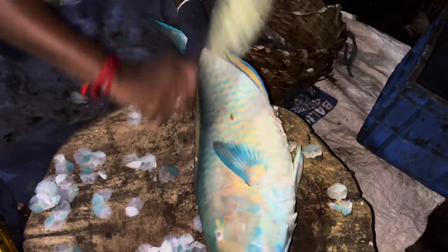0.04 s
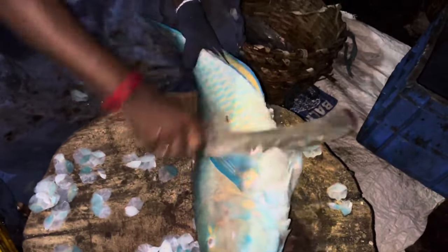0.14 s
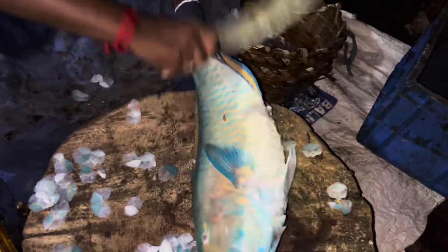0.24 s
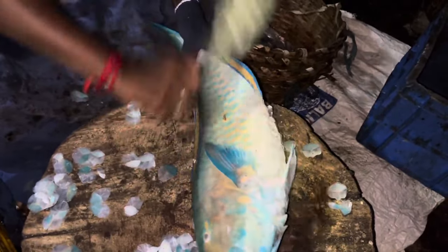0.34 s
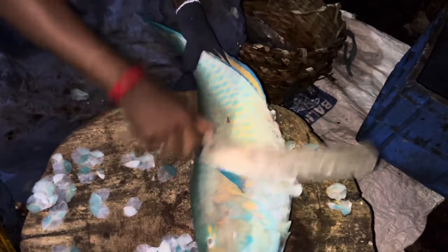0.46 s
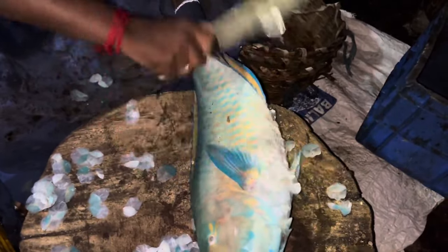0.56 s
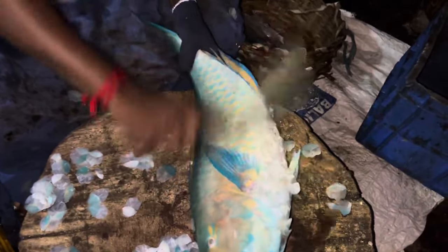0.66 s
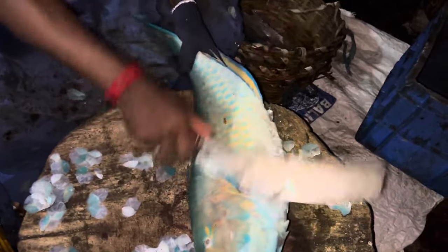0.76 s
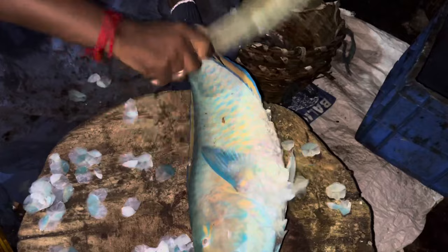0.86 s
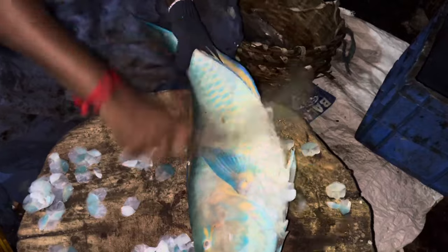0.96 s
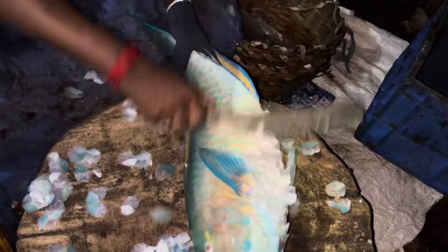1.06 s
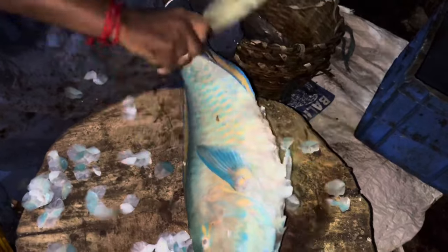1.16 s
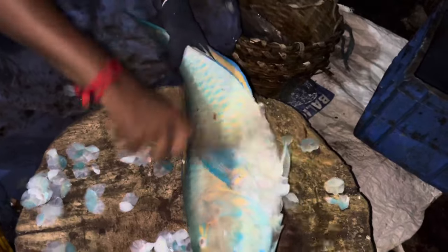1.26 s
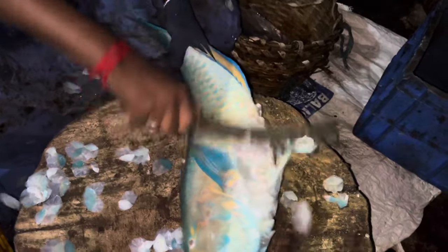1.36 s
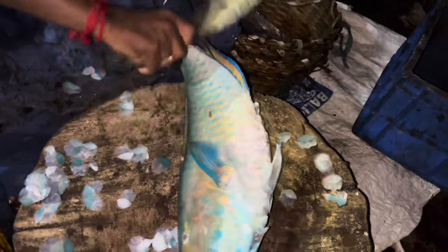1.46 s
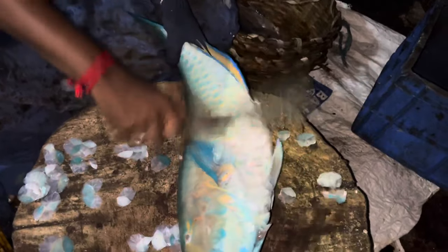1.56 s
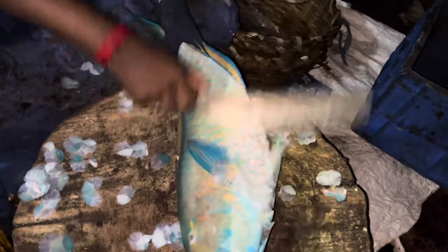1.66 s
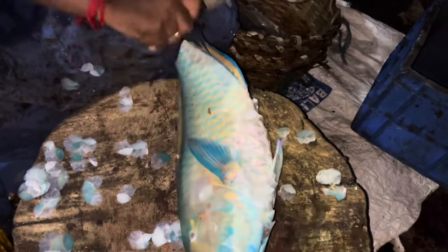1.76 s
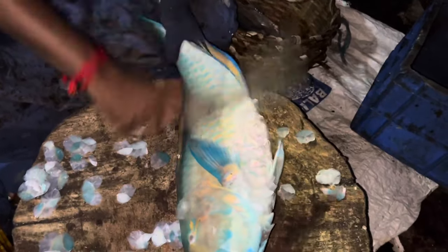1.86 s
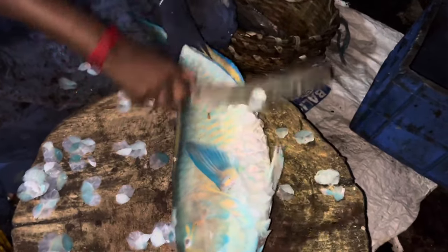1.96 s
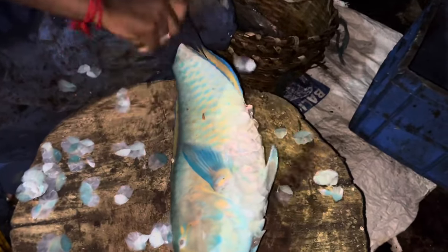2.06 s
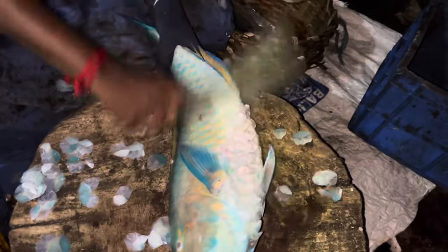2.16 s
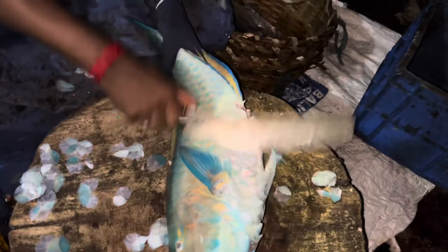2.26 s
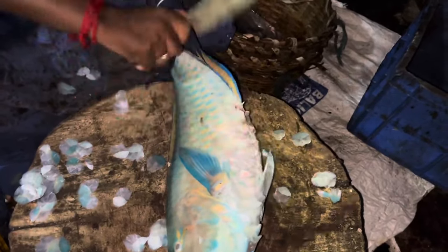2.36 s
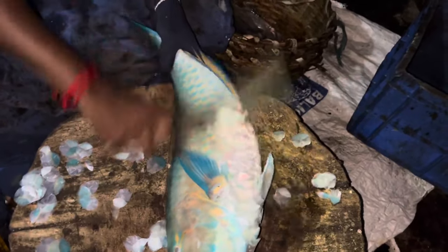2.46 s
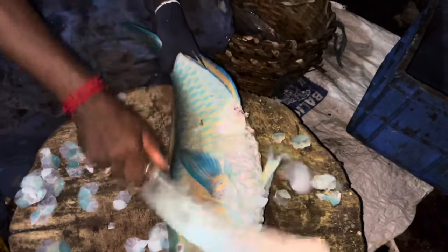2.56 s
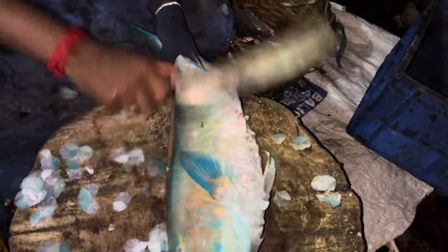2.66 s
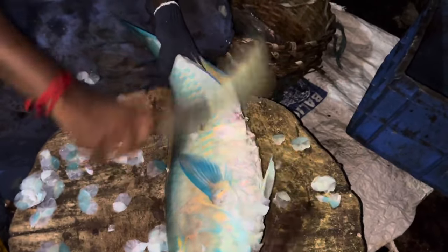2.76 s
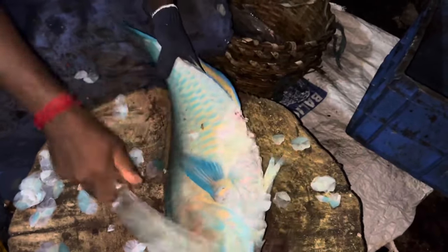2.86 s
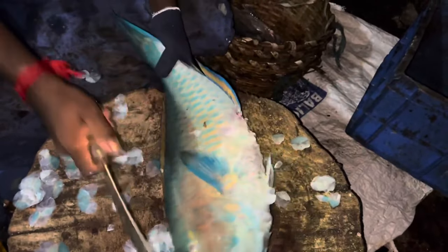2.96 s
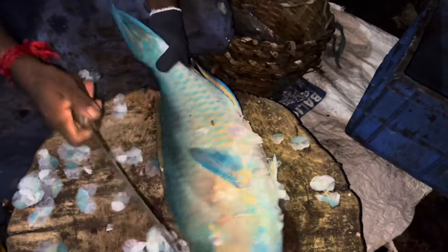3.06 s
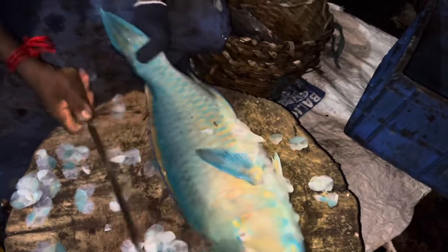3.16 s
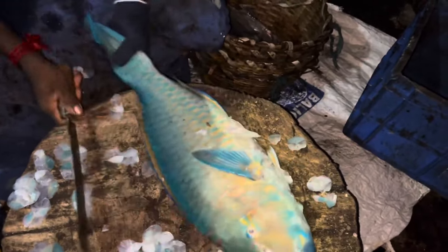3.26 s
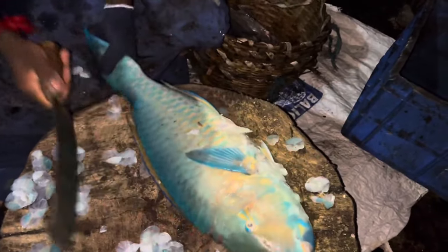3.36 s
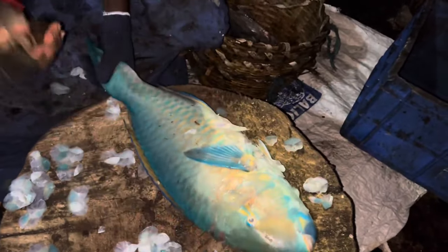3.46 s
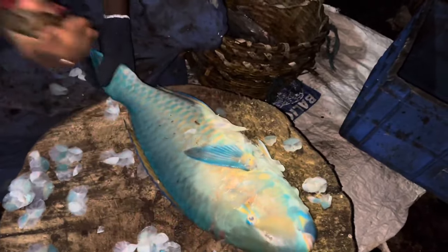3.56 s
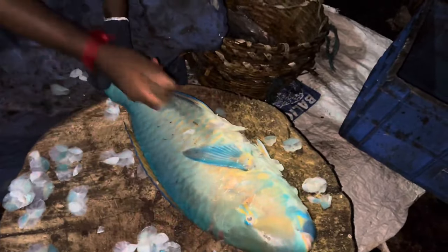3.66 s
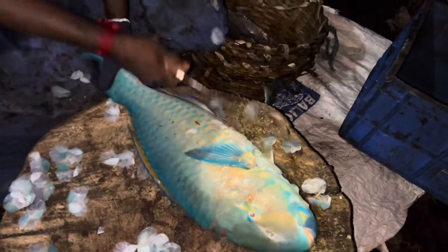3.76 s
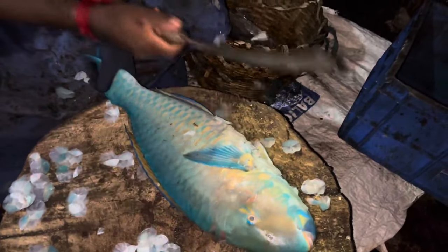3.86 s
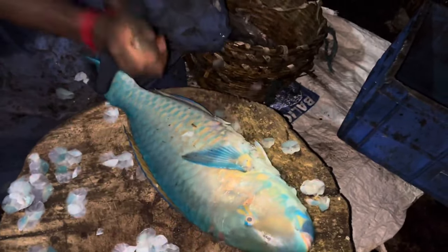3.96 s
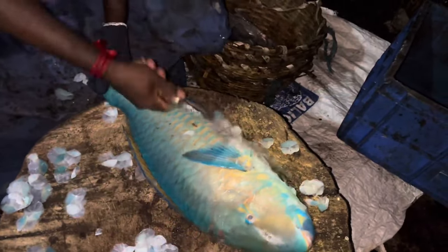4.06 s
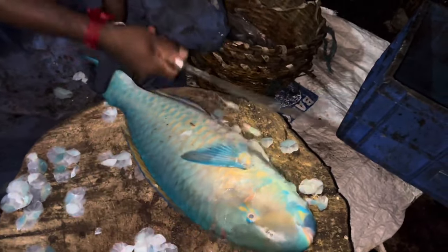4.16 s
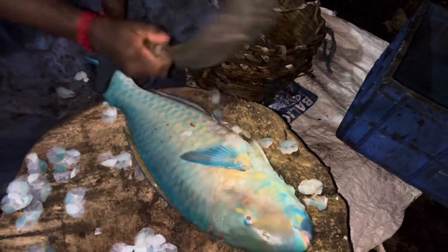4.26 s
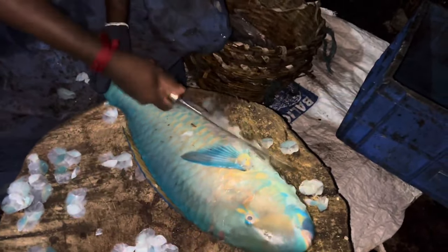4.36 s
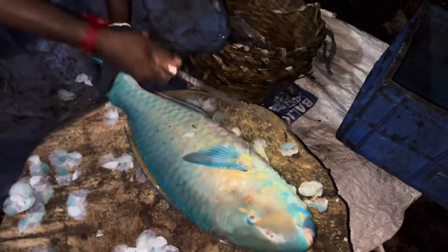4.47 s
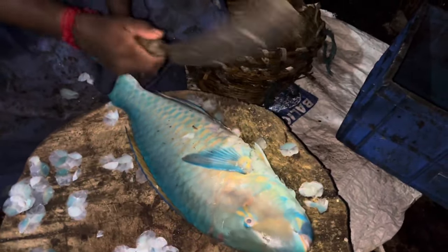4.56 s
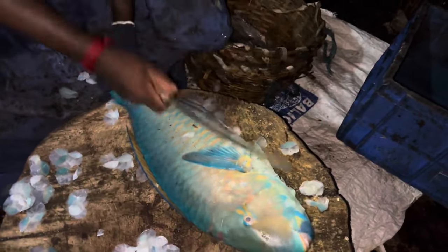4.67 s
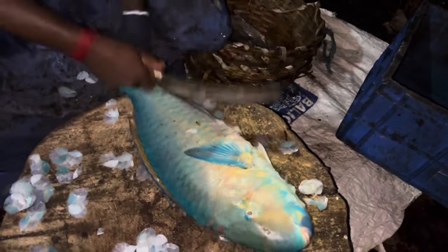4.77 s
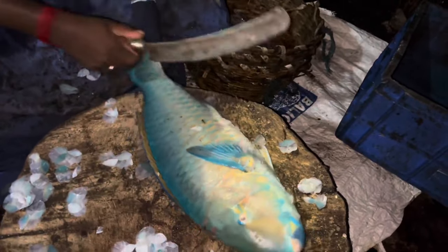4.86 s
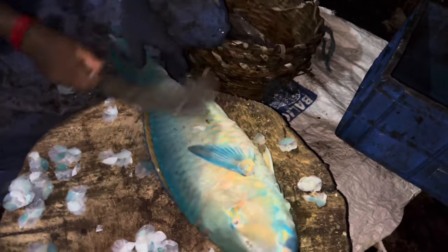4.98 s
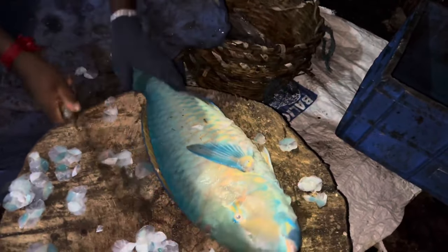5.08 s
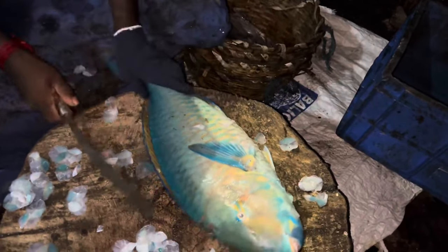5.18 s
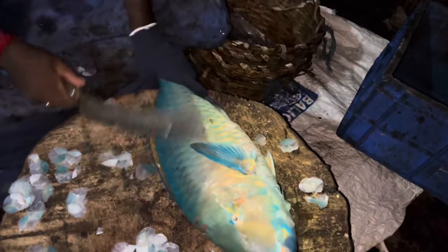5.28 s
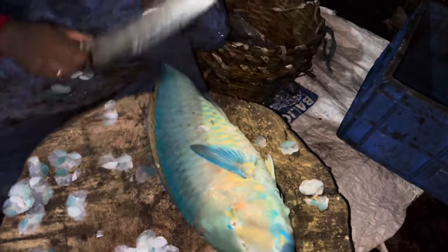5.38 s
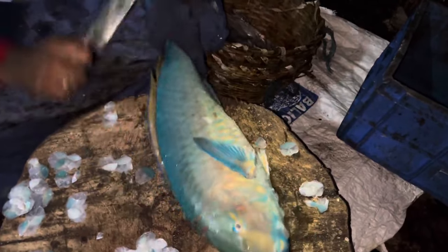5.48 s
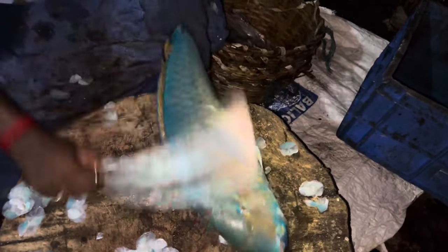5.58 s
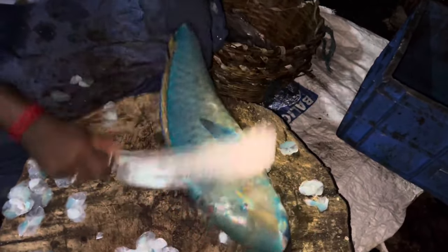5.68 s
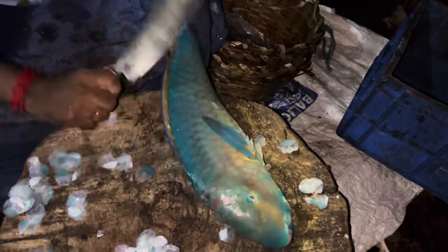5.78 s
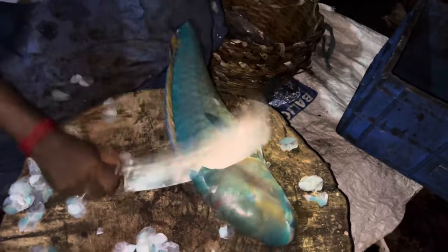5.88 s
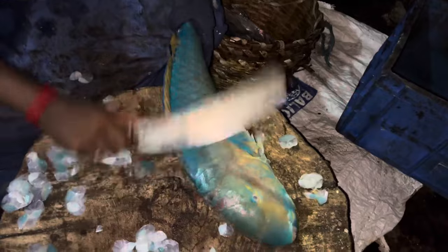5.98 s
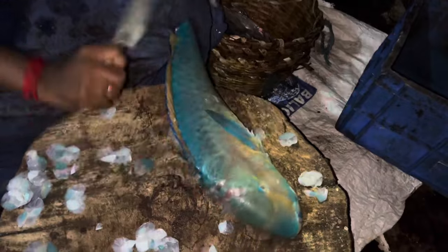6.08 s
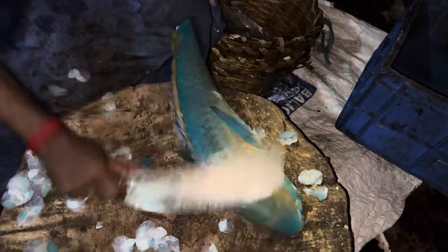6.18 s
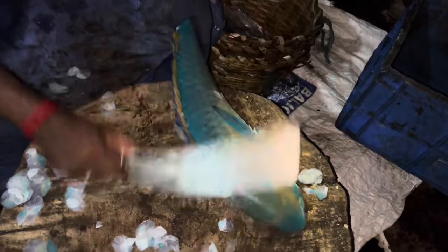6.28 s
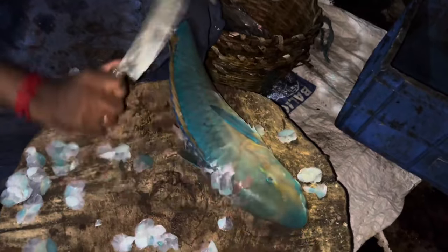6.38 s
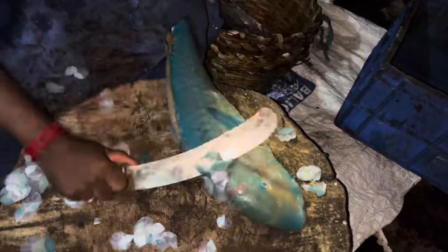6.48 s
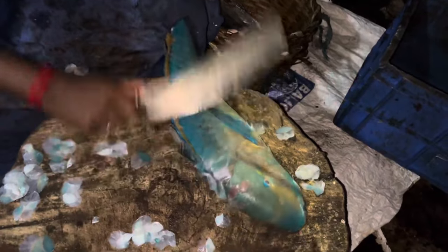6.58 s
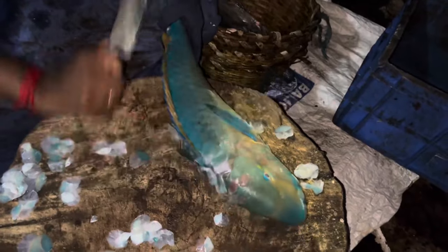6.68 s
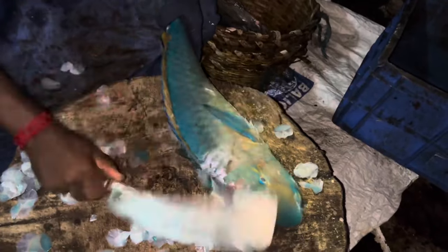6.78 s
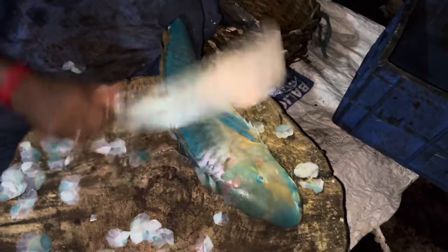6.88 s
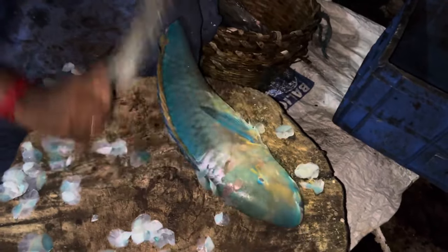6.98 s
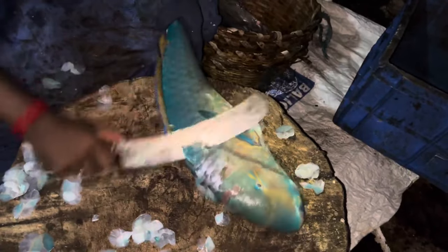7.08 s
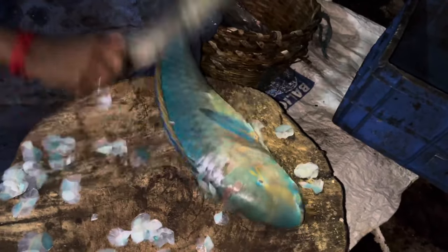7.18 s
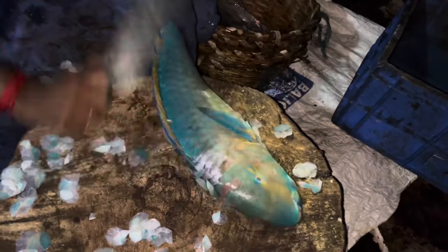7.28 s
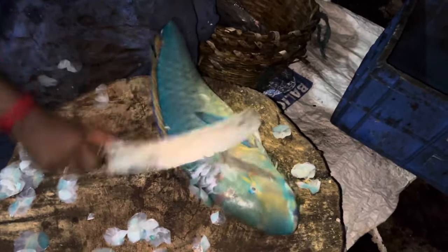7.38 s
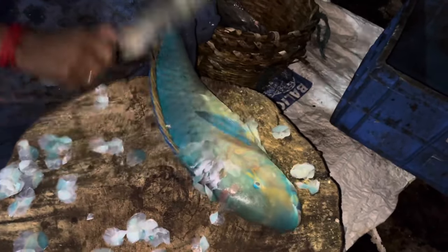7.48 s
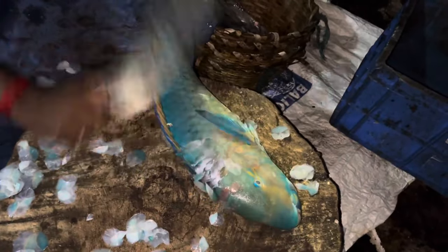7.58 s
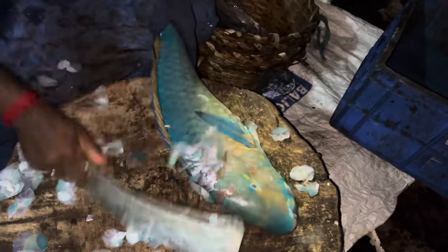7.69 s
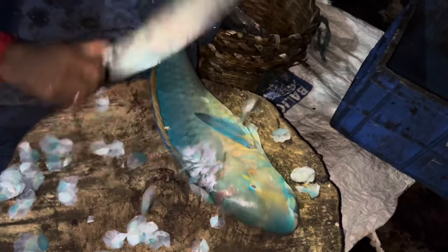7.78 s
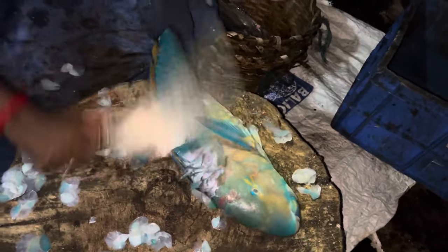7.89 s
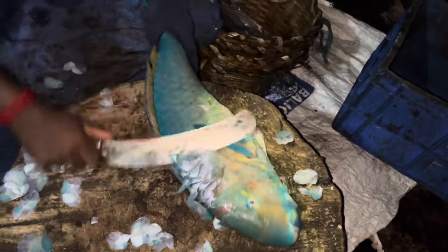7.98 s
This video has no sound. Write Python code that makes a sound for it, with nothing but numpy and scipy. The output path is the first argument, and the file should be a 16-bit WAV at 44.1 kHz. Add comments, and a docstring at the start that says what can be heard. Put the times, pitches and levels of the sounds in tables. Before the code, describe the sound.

Close to the microphone, a heavy knife scrapes a large fish on a wooden block in short crackling strokes, about three a second, each with a soft wet thud. A pause and faint rustle as the fish is turned, then sharper strokes with hard edge raps. Two wind gusts buffet the microphone late on. Far traffic, low bustle and a motor hum lie beneath in an open shed.

```python
"""An open market shed, two microphone ports: far traffic and bustle, a deep hum, a motor hum and faint insects run on.
A heavy blade swung along a large fish on a wooden block soon joins, about three strokes a second: bursts of
tiny snaps tear the scales loose, damped cycles thud in the body, delays give the shed's echo.
A thin sine squeaks once; the fish rustles faintly as it is turned, the edge raps hard in short ringing modes,
then two gusts of resonant and broad noise buffet the ports while the strokes go on."""
import sys
import numpy as np
from scipy import signal
from scipy.fft import rfft, irfft, next_fast_len
from scipy.io import wavfile
from scipy.ndimage import uniform_filter1d

SR = 44100
rng = np.random.default_rng(int(sys.argv[2]) if len(sys.argv) > 2 else 0)


def master(y):
    """Save y as 16-bit WAV."""
    cut = np.clip(np.atleast_2d(y).T, -1, 1)
    pcm = np.round(cut * 32767)  # scale
    wavfile.write(sys.argv[1], SR, pcm.astype(np.int16))


def gain_from_decibels(decibels):
    """Convert decibel values to linear amplitude factors."""
    exponent = np.asarray(decibels, float) / 20
    return 10 ** exponent


N = 354475

# Likeness of left and right in far sound and wind. Each row: frequency in Hz, likeness from 0 to 1.
LIKENESS = [(60, 1), (130, 0.95), (290, 0.69), (700, 0), (1500, 0.73), (3500, 0.84), (6000, 1),
            (7500, 0.83), (15000, 1)]
# Deep hum under the market. Each row: time in seconds, level in dB.
DEEP_HUM_LEVELS = [(0.0, -40), (0.15, -33.5), (0.85, -34.5), (2.57, -33), (2.71, -35), (3.6, -28),
                   (4.7, -33.5), (4.88, -30), (6.13, -35.5), (8.04, -31.5)]
# Far market, and the low end of the wind near 5.6 and 7.3 s. Each row: time in seconds, low level in dB,
# upper level in dB.
MARKET_LEVELS = [(0, -31.5, -32), (1.5, -33, -37.5), (3, -32, -35.5), (3.6, -36, -40.5), (4.1, -31.5, -37),
                 (4.6, -31, -37), (5, -33, -38.5), (5.6, -30.5, -36.5), (6.3, -33.5, -41),
                 (6.8, -35, -38.5), (7.3, -22.5, -27), (7.7, -32, -40), (8.04, -31.5, -35.5)]
# Colour of the far market. Each row: frequency in Hz, relative density in dB per Hz.
MARKET_SPECTRUM = [(41, -29), (70, -12), (82, -25), (115, 14), (151, -17), (248, -1), (278, -8), (320, -7),
                   (373, -17.5), (408, -20), (641, -35.5), (920, -30), (1380, -36), (6000, -48.5),
                   (6720, -53), (15500, -64.5)]
# Motor hum. Each row: time in seconds, level in dB that its tones are set against.
MOTOR_LEVELS = [(0, -34.5), (.8, -34.5), (1.2, -33.5), (1.8, -36.5), (2.4, -37), (4.6, -40.5), (5, -46.5),
                (8.04, -44.5)]
# Strokes of the blade against the scales, and two faint rustles as the fish is turned (3.13 and 3.38 s).
# Each row: start in seconds, contact in ms, crackle in dB, woody knock in dB re crackle, hiss in dB re crackle.
STROKES = [(.133, 11, -16, -7, 1.5), (.428, 37, -25, -25, -0.5), (0.716, 51, -19, -6.5, -6),
           (1.009, 24.7, -22.5, -6, 1), (1.308, 38.2, -19.5, -7, -2.5), (1.605, 20, -21, -8.5, 1),
           (1.912, 19, -22.5, -11, 2), (2.216, 28, -20, -8, 0), (2.511, 43, -19.5, -9, -0.5),
           (2.825, 49, -24.5, -6, -6), (3.13, 98, -38.5, -2, -3.5), (3.234, 4.9, -23, -1.5, -0.5),
           (3.38, 64, -44.5, -7, -2.5), (3.741, 2.9, -9, -7, 0.5), (4.096, 7, -14.5, -5.5, 2.5),
           (4.411, 16, -19.5, -10.5, 2), (4.726, 9.5, -15, -11, 3.5), (4.775, 18, -27, -1, 0.5),
           (5.646, 7.2, -12.5, -4.5, 1.5), (5.931, 1.9, -13, -10, -4), (6.225, 11.6, -9.5, -8.5, -2.5),
           (6.510, 1.3, -8, -11, -0.5), (6.8, 8.7, -8.5, -9.5, -4), (7.081, 2.4, -9, -6, -2),
           (7.368, 5.4, -9.5, -10.5, 0), (7.661, 7.8, -9.5, -8.5, -2), (7.942, 7.2, -20, -7, 2.5)]
# Single large scales popping loose. Each row: time in seconds, crackle in dB, hiss in dB re crackle.
POPS = [(0.139, -6, -6), (0.4378, -6.5, -2.5), (0.7371, -2, 1), (1.0198, -7.5, -4), (1.056, -20.5, -5),
        (1.315, -17, -4), (1.6205, -10.5, -10), (1.6565, -13.5, -4), (2.2337, -6.5, -2),
        (2.268, -19.5, -4.5), (2.5244, -7, -3), (2.5494, -26, -4.5), (2.5632, -16, -2), (2.8314, -8.5, -2),
        (2.8348, -12, 5), (2.86, -13.5, -20), (2.8801, -32, 14.5), (3.737, -6, -4.5), (4.1028, -11, -26),
        (5.6473, -12, -4), (5.934, -15.5, -4), (7.942, -12, 1), (7.9568, -14.5, -6)]
# Dull woody knocks on the block. Each row: time in seconds, knock in dB, fade in ms.
KNOCKS = [(.328, -32.5, 30), (1.256, -35.5, 9.7), (2.245, -21.5, 17), (3.1118, -26, 9.6),
          (3.166, -25.5, 28), (3.483, -29, 28), (3.7755, -15.5, 5.1), (4.1368, -20, 8.7),
          (4.4375, -15, 9.1), (5.1248, -15, 4.2), (5.136, -17.5, 9)]
# Resonances of scales and blade. Each row: centre in Hz, width in Hz, gain in dB.
BLADE_RESONANCES = [(1130, 857, 17.5), (1760, 950, 7.5), (2738, 580, 7), (4020, 2700, 9), (7180, 926, 27),
                    (10060, 2000, -22)]
# Fish body thudding on the block. Each row: start in seconds, relative level in dB, pitch in Hz.
THUDS = [(0.136, -25, 158), (0.44, -25.5, 201), (0.727, -23, 174), (0.741, -21, 207), (1.013, -23.5, 210),
         (1.313, -20, 190), (1.332, -14.5, 193), (1.605, -21.5, 217), (1.912, -22.5, 270),
         (2.228, -25.5, 229), (2.515, -22.5, 197), (2.554, -22, 211), (2.565, -20, 233), (2.643, -26, 177),
         (2.826, -24, 217), (3.233, -18.5, 306), (3.739, -14.5, 244), (4.096, -13.5, 293),
         (4.408, -20, 202), (4.729, -15, 250.5), (5.126, -18, 260), (7.945, -27, 256)]
# A thin squeak, one row: middle in seconds, length to either side in seconds, pitch in Hz, level in dB.
SQUEAK = (1.555, .06, 3580, -56)
# Hard raps of the edge. Each row: start in seconds, relative level in dB, brightness in dB per octave.
RAPS = [(3.232, -19, -3), (3.772, -11.5, 4), (4.134, -20.5, -5.5), (4.4348, -9.5, 5), (4.778, -26.5, -4.5),
        (5.124, -9, 6)]
# Modes of edge and block. Each row: frequency in Hz, relative level in dB, 60 dB decay time in seconds.
EDGE_MODES = [(630, -7, .02), (970, -3, .02), (1300, -5, .016), (1950, 0, .011), (3000, 0, .009),
              (3980, -4, .008)]
# Two gusts, a list of rows for each. Each row: time in seconds, boom in dB, rush in dB.
GUSTS = [
    [(5.16, -21, -26), (5.2, -37.5, -32.5), (5.332, -24.5, -26), (5.4, -29.5, -25.5), (5.458, -22, -23),
     (5.51, -15, -18), (5.55, -25, -29.5), (5.576, -13.5, -12), (5.646, -33, -25.5), (5.668, -13.5, -15.5),
     (5.724, -27, -24.5), (5.75, -15, -11), (5.776, -12, -19), (5.802, -20.5, -23), (5.892, -27.5, -26),
     (5.92, -33, -32), (6.022, -31, -30), (6.046, -22.5, -34), (6.132, -42, -44), (6.2, -44, -51)],
    [(6.81, -26, -28), (6.816, -22.5, -44), (6.832, -17, -31), (6.864, -30, -37.5), (6.962, -30, -23.5),
     (7.014, -29, -32.5), (7.042, -16.5, -18), (7.06, -6, -18.5), (7.096, -26, -38), (7.12, -14, -13),
     (7.172, -14, -24.5), (7.264, -24.5, -33.5), (7.292, -25, -21), (7.34, -13.5, -19.5),
     (7.396, -22, -24.5), (7.45, -16, -27.5), (7.538, -38, -34.5), (7.602, -24.5, -26), (7.654, -29, -38),
     (7.66, -25, -34)],
]
# Colour of the wind's rush. Each row: frequency in Hz, relative density in dB per Hz.
RUSH_SPECTRUM = [(160, -54), (280, -3.5), (682, 0.5), (742, -4.5), (1020, -9.5), (6690, -40.5),
                 (8330, -43.5), (9370, -37), (11300, -34.5), (13800, -65), (15500, -105)]
# Right port against left. Each row: frequency in Hz, radians it trails, dB it is dimmer (below 0: brighter).
PORT_TURN = [(0, 0, 0), (300, .2, 1.2), (700, .9, -.5), (1300, 1.3, -.5), (2500, 1.3, .5), (5500, 1.3, 1.5),
             (7000, 1.9, 0), (7800, 3.0, -1.9), (9200, 3.3, -1.9), (10000, 5.0, -1.9), (10900, 6.15, -1.9),
             (12900, 6.4, -1.9), (13700, 8.8, -1.9), (22050, 9.6, -1.9)]


def rms_one(x):
    """Scale to unit rms."""
    return x / np.sqrt(np.mean(x ** 2) + 1e-20)


def in_time(rows):
    """Columns of a curve, one value per sample."""
    s, *columns = np.transpose(rows)
    return [np.interp(np.arange(N) / SR, s, c) for c in columns]


def at_hz(points, hz):
    """Read a spectrum on a log-frequency axis."""
    point_hz, values = np.transpose(points)
    return np.interp(np.log(hz), np.log(point_hz), values)


def drift(rate_hz):
    """Slow chance of spread 1: noise through two equal low-pass poles, drawn every 40 samples."""
    r = np.exp(-80 * np.pi * rate_hz / SR)
    slow = signal.lfilter([1], [1, -2 * r, r * r], rng.standard_normal(N // 40 + 2002))
    slow = rms_one(slow[2000:])   # the filter has settled
    return np.interp(np.arange(N) / 40, np.arange(len(slow)), slow)


def resonance(x, hz, width_hz):
    """Two-pole resonance, gain 1 on top."""
    r = np.exp(-np.pi * width_hz / SR)
    poles = [1, -2 * r * np.cos(2 * np.pi * hz / SR), r * r]
    return signal.lfilter([(1 - r * r) / 2, 0, (r * r - 1) / 2], poles, x)


def band(x, low_hz, high_hz):
    """Butterworth band-pass."""
    return signal.sosfilt(signal.butter(2, [low_hz, high_hz], "band", fs=SR, output="sos"), x)


def pair(mid, side, alike):
    """Left and right from two unrelated noises."""
    alike = np.clip(alike, 0, 1)
    return np.sqrt(1 + alike) * mid + np.sqrt(1 - alike) * side * [[1], [-1]]


def banded_noise(spectrum, shared_db, own_db, rate_hz):
    """Half-octave bands of stereo noise that flicker together and alone; rms 1 from 400 to 2000 Hz."""
    out, together = 0, drift(rate_hz)
    lowest = spectrum[0][0]
    edges = lowest * 2 ** np.arange(0, np.log2(16500 / lowest), .5)
    white = rng.standard_normal((2, 2, N))   # neighbouring bands use different noise
    for k, (low, high) in enumerate(zip(edges, np.append(edges[1:], 16000))):
        hz = np.sqrt(low * high)
        gain = gain_from_decibels(at_hz(spectrum, hz) + shared_db * together + own_db * drift(rate_hz))
        mid, side = band(white[k % 2], low, high)
        out = out + gain * pair(mid, side, at_hz(LIKENESS, hz))
    return out / np.sqrt(np.mean(band(out, 400, 2000) ** 2))


def deep_hum():
    """A low sine of wandering pitch and level, roughened by a narrow band of noise."""
    level_db, = in_time(DEEP_HUM_LEVELS)
    wobble = 2 * np.pi * np.cumsum(51.9 + 3.63 * drift(3.75)) / SR   # Hz, spread in Hz
    rough = rms_one(band(band(rng.standard_normal(N), 42.2, 79), 41, 79))
    return gain_from_decibels(level_db + 1.4 * drift(10.5)) * (np.sin(wobble) + .5 * rough)


def traffic_and_bustle():
    """One flickering far noise, split at 340 Hz: traffic and the wind's low end below, bustle above."""
    low_db, upper_db = in_time(MARKET_LEVELS)
    far = banded_noise(MARKET_SPECTRUM, shared_db=3.32, own_db=1.5, rate_hz=4.45)
    low = gain_from_decibels(low_db) * rms_one(band(far, 62, 340))
    return low + gain_from_decibels(upper_db) * band(far, 340, 16000)


def motor_hum():
    """A tone of unsteady pitch and its next two multiples, each wavering in level alone."""
    base_hz, tones_db, waver_db = 124.5, [-2.5, -7, -11.5], 4.5
    level_db, = in_time(MOTOR_LEVELS)
    pitch_hz = base_hz * (1 + 0.0039 * drift(5.0) + 0.012 * drift(20.0))
    turn, hum = 2 * np.pi * np.cumsum(pitch_hz) / SR, 0
    for multiple, tone_db in enumerate(tones_db, 1):
        loudness = np.sqrt(2) * gain_from_decibels(level_db + tone_db + waver_db * drift(1.4))
        hum = hum + loudness * np.sin(multiple * turn)
    return hum


def insects():
    """Noise through the same resonance twice leaves a thin, slowly wavering hiss."""
    centre_hz, width_hz, level_db = 6610, 450, -58.5
    thin = resonance(rng.standard_normal((2, N)), centre_hz, width_hz)
    thin = rms_one(resonance(thin, centre_hz, width_hz))
    return pair(*(gain_from_decibels(level_db + 2.0 * drift(2.1)) * thin), 0.14)


def tearing():
    """Strokes, rustles, pops and knocks are bursts of tiny snaps that swell, fade and drag; scales and blade colour them."""
    bite_ms, lift_ms, sag_db = 2.85, 2.85, -4   # stroke swell and fade; loss over any contact
    snag_db, snag_rate_hz = 4, 54   # unevenness of a stroke
    approach_db, approach_ms = -32, 13.4   # the edge skims before it bites
    drag_db, drag_ms = -15, 40
    pop_swell_ms, pop_fade_ms, pop_knock_db = 1.7, 2.55, -17
    thump_db = -10   # low thump of strokes and pops re their knock
    lead = SR // 20
    ms = np.arange(-lead, 4 * lead) * 1000 / SR
    bursts = np.zeros((4, N + len(ms)))   # power of thump, knock, crackle, hiss
    snags = gain_from_decibels(snag_db * drift(snag_rate_hz))

    def add(s, levels_db, swell_ms, hold_ms, fade_ms, uneven=1):
        """One burst: skim, swell, sagging hold, fade and drag."""
        after = np.maximum(ms - hold_ms, 0)
        sag = gain_from_decibels(sag_db * np.clip(ms / max(hold_ms, 1), 0, 1))
        fade = sag * (np.exp(-after / fade_ms) + gain_from_decibels(drag_db) * np.exp(-after / drag_ms))
        skim = gain_from_decibels(approach_db) * np.exp(-abs(ms) / approach_ms)
        swell = np.exp(-(ms / swell_ms) ** 2) + skim
        shape = np.where(ms < 0, swell, fade) * uneven
        start = int(s * SR)
        bursts[:, start:start + len(ms)] += (gain_from_decibels(np.array(levels_db))[:, None] * shape) ** 2

    for s, contact_ms, db, knock_db, hiss_db in STROKES:
        uneven = np.roll(snags, -int(s * SR))[:len(ms)]
        levels_db = [db + knock_db + thump_db, db + knock_db, db, db + hiss_db]
        add(s, levels_db, bite_ms, contact_ms, lift_ms, uneven)
    for s, db, hiss_db in POPS:
        levels_db = [db + pop_knock_db + thump_db, db + pop_knock_db, db, db + hiss_db]
        add(s, levels_db, pop_swell_ms, 0, pop_fade_ms)
    for s, db, fade_ms in KNOCKS:
        add(s, [db - 2, db, db - 17.5, db - 18.5], pop_swell_ms, 0, fade_ms)

    snaps_per_s, spread_db = 1800, 3.5
    sizes = gain_from_decibels(spread_db * np.minimum(rng.exponential(1, N), 4)) * rng.choice([-1, 1], N)
    snaps = rms_one(sizes * (rng.random(N) < snaps_per_s / SR))
    snaps = snaps + .4 * rng.standard_normal(N)
    snaps = snaps + sum((gain_from_decibels(db) - 1) * resonance(snaps, hz, width) for hz, width, db in BLADE_RESONANCES)
    thump, knock, crackle, hiss = np.sqrt(bursts[:, lead:lead + N])
    return (thump * rms_one(band(snaps, 350, 850))
            + knock * rms_one(band(snaps, 600, 1700))
            + crackle * rms_one(band(snaps, 1800, 5500))
            + hiss * rms_one(band(snaps, 5500, 14500)))


def thuds():
    """Wet flesh on wood: a few heavily damped cycles, and a deeper push of the block."""
    rise_ms, fade_cycles, push_db = 2.08, 1.43, -8
    t, out = np.arange(SR // 8) / SR, np.zeros(N + SR // 8)
    for s, level_db, hz in THUDS:
        shape = (1 - np.exp(-(1000 * t / rise_ms) ** 2)) * np.exp(-hz * t / fade_cycles)
        push = gain_from_decibels(push_db) * np.sin(2 * np.pi * 0.41 * hz * t)
        cycles = np.sin(2 * np.pi * hz * t) + push
        start = int(s * SR)
        out[start:start + len(t)] += gain_from_decibels(level_db + 13.5) * shape * cycles   # makes up for the damping
    return out[:N]


def shed(x):
    """Eight feedback delays a side, duller on every round."""
    t60_s, wall_cut_hz = 0.26, 8800   # decay time before the dulling
    size = next_fast_len(N + SR)
    bins = np.arange(size // 2 + 1)
    z = np.exp(-2j * np.pi * bins / size)
    dull = np.exp(-2 * np.pi * wall_cut_hz / SR)
    walls, echoes = (1 - dull) / (1 - dull * z), np.zeros((2, len(z)), complex)
    lags = (rng.uniform(.008, 0.024, size=16) * SR).astype(int)
    for k, lag in enumerate(lags):
        loop = gain_from_decibels(-60 * lag / SR / t60_s) * walls * np.exp(-2j * np.pi * lag * bins / size)
        echoes[k % 2] += (-1) ** (k // 2) * loop / (1 - loop)
    return band(irfft(echoes * rfft(x, size), size)[:, :N], 200, 6500)


def squeak():
    """One faint steady sine that swells and fades smoothly."""
    middle, length, hz, level_db = SQUEAK
    t = np.arange(N) / SR
    return gain_from_decibels(level_db) * np.exp(-((t - middle) / length) ** 4) * np.sin(2 * np.pi * hz * t)


def raps():
    """The edge meets bone or wood: every mode rings briefly, a brighter blow favouring the high ones."""
    t, out = np.arange(SR // 10) / SR, np.zeros(N + SR // 10)
    for s, level_db, tilt_db in RAPS:
        start = int(s * SR)
        for hz, mode_db, t60 in EDGE_MODES:
            ring_db = level_db + mode_db + tilt_db * np.log2(hz / 2000) - 60 * t / t60
            out[start:start + len(t)] += gain_from_decibels(ring_db) * np.sin(2 * np.pi * hz * t)
    return out[:N]


def wind():
    """Eddies make the port cavity boom in lumps; a broad rush flickers, its fine hiss following slowly."""
    port_hz, port_width_hz, evenness = 210, 60, 0.64
    t, boom, rush = np.arange(N) / SR, np.zeros(N), np.zeros(N)
    for rows in GUSTS:
        boom_db, rush_db = in_time(rows)
        blowing = np.clip(np.minimum(t - rows[0][0], rows[-1][0] - t) / .012, 0, 1)
        boom += blowing * gain_from_decibels(boom_db)
        rush += blowing * gain_from_decibels(rush_db)
    eddies = band(rng.standard_normal((2, N)), 180, 238.5)
    cavity = pair(*resonance(eddies, port_hz, port_width_hz), 0.92)
    swing = np.sqrt(uniform_filter1d(np.mean(cavity ** 2, axis=0), size=SR // 70) + 1e-12)
    # the boom's random swing is partly evened out, so its lumps follow the gust curve
    cavity = rms_one(cavity / swing ** evenness)
    flicker = rms_one(gain_from_decibels(-1.0 * drift(23.4)))
    air = banded_noise(RUSH_SPECTRUM, shared_db=1.0, own_db=2.5, rate_hz=18.0)
    fine = signal.sosfilt(signal.butter(1, 3000, "high", fs=SR, output="sos"), air)
    swell = uniform_filter1d(rush, size=SR // 8)   # slow strength of the gust
    return boom * cavity + flicker * rush * (air - fine) + gain_from_decibels(2.0) * swell * fine


def scene():
    """The far market, the block with its shed echo, and the wind, summed and balanced between the ports."""
    market = deep_hum() + traffic_and_bustle() + motor_hum() + insects() + squeak()
    scales = tearing()
    block = scales + thuds() + raps() + gain_from_decibels(-16.5) * shed(scales)
    balance = gain_from_decibels([[.95], [-.95]])   # dB: left gain about 1.12, right about 0.90
    return (market + block + wind()) * balance


def roll_off(x):
    """The treble ends steeply here."""
    return signal.sosfilt(signal.butter(12, 16520, fs=SR, output="sos"), x)


def record(dry):
    """The right port trails and dims each frequency its own way, then both ports saturate softly."""
    size = next_fast_len(N + 1024)
    hz = np.arange(size // 2 + 1) * SR / size
    port_hz, radians, dim_db = np.transpose(PORT_TURN)
    # the right turns about half a cycle near 8.5 kHz, a full one near 12 kHz
    turn = gain_from_decibels(-np.interp(hz, port_hz, dim_db)) * np.exp(-1j * np.interp(hz, port_hz, radians))
    right = irfft(rfft(dry[1], size) * turn, size)[:N]
    ports = np.array([dry[0], right])
    return roll_off(np.tanh(ports))


dry = scene()
out = record(dry)
master(out)
```